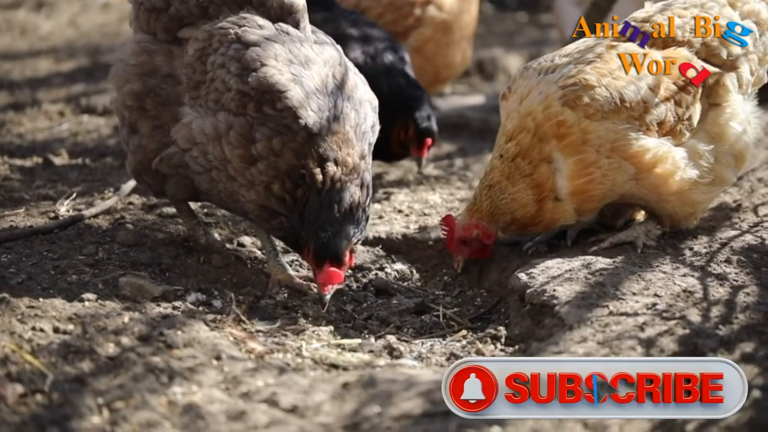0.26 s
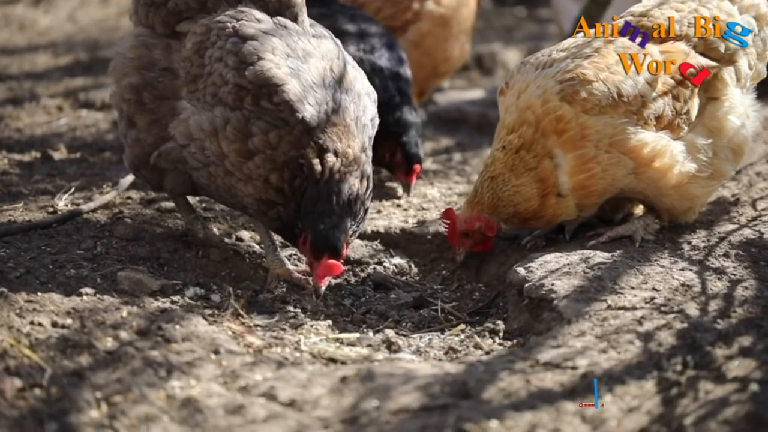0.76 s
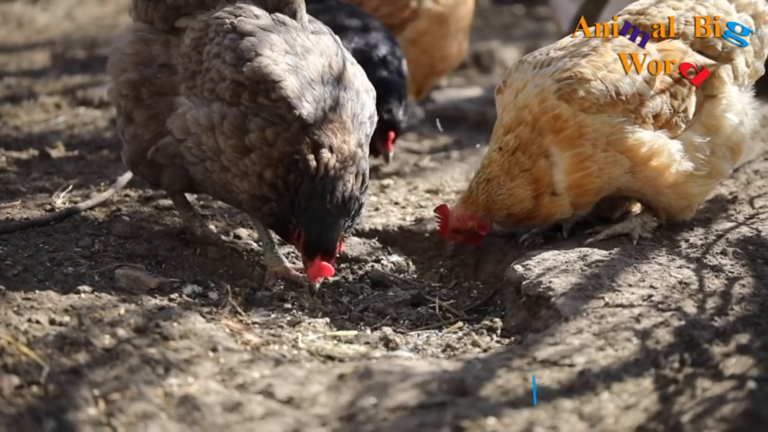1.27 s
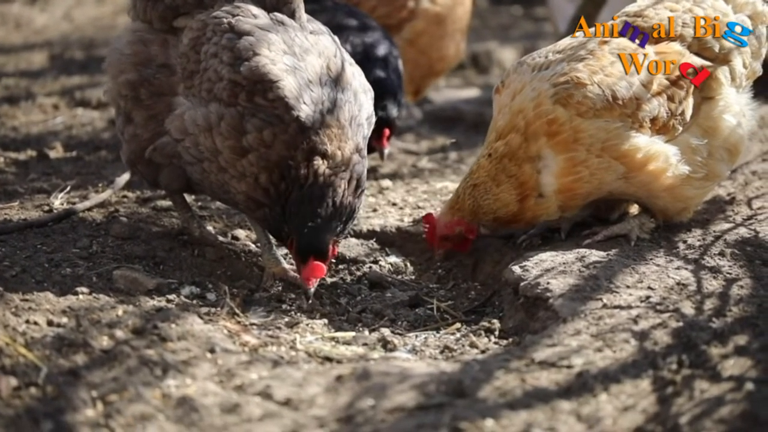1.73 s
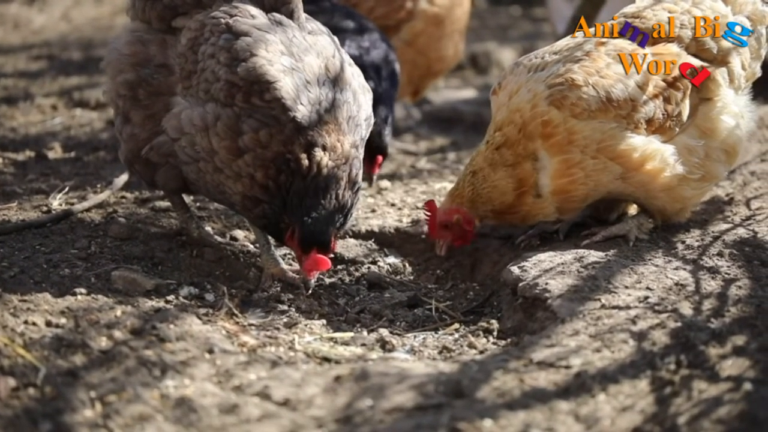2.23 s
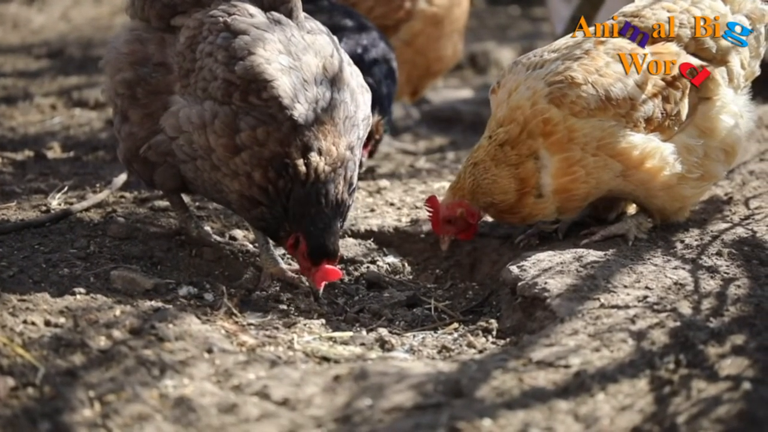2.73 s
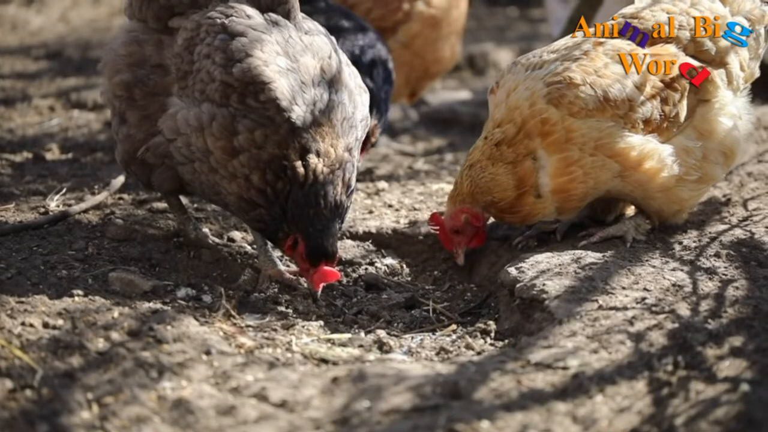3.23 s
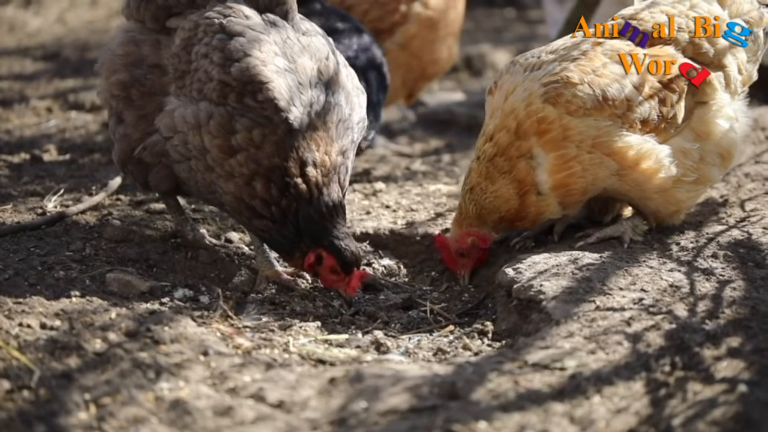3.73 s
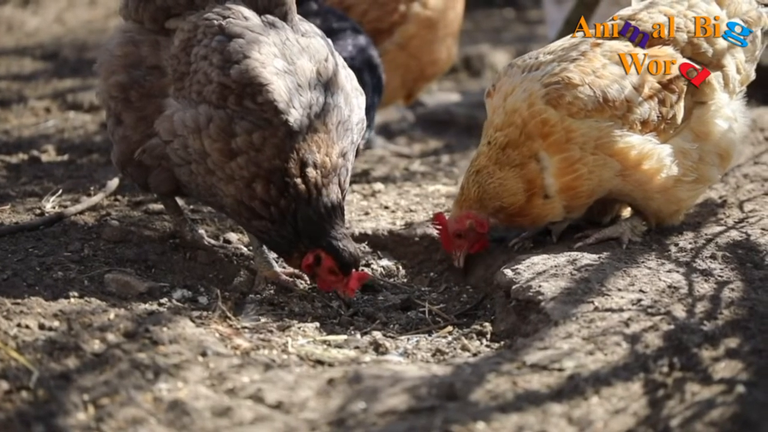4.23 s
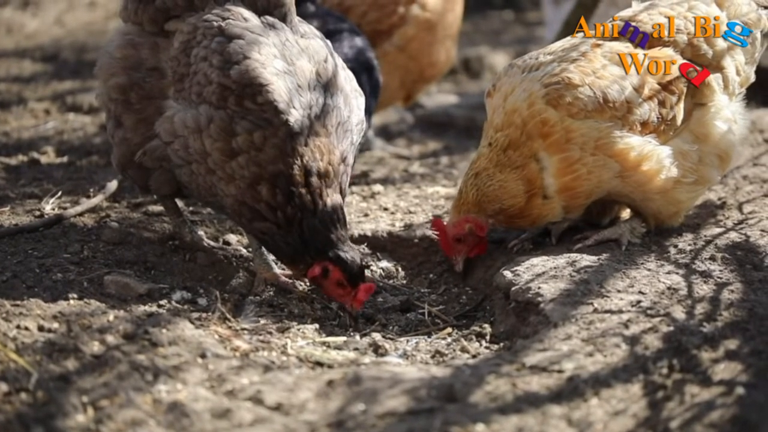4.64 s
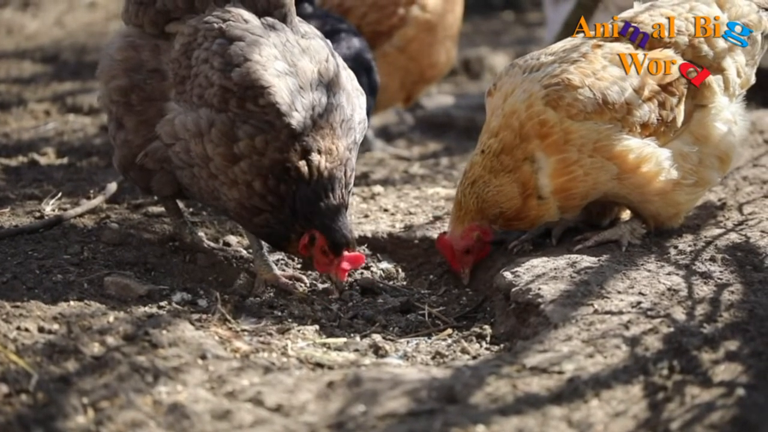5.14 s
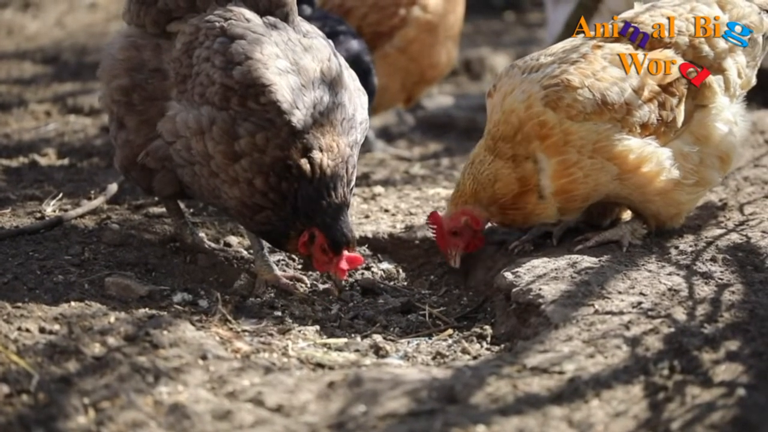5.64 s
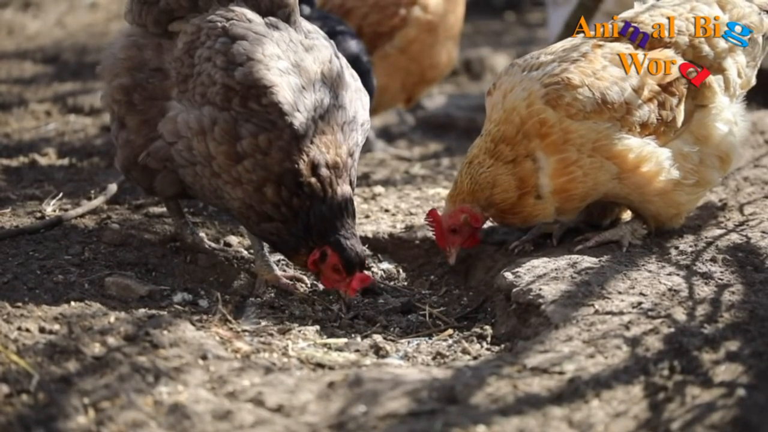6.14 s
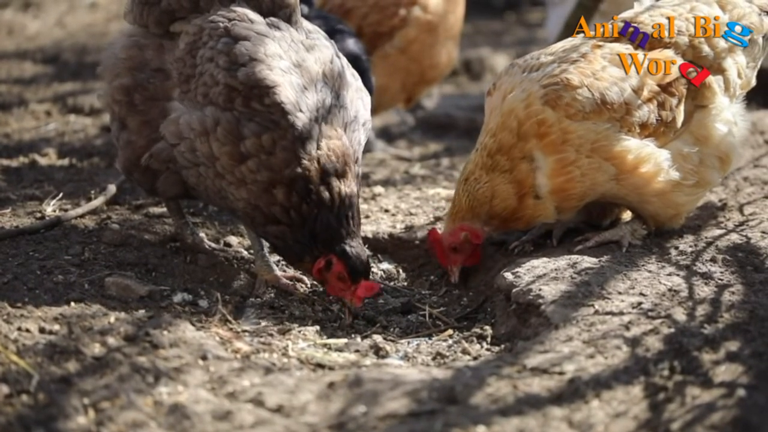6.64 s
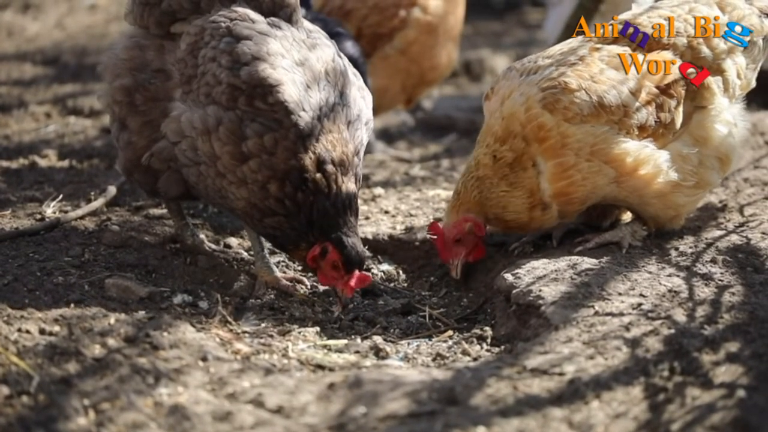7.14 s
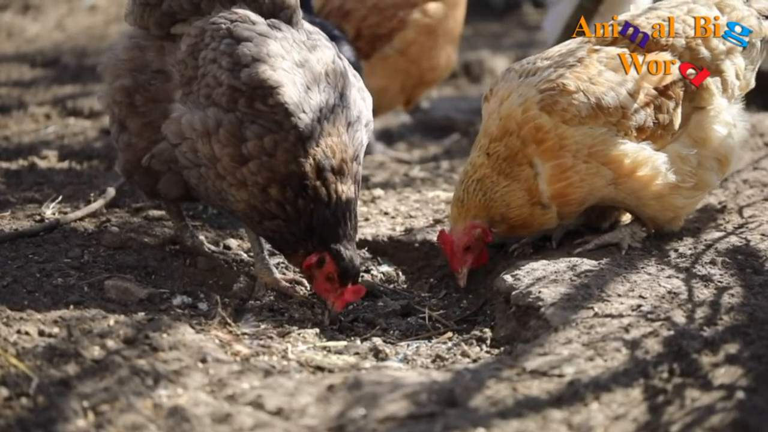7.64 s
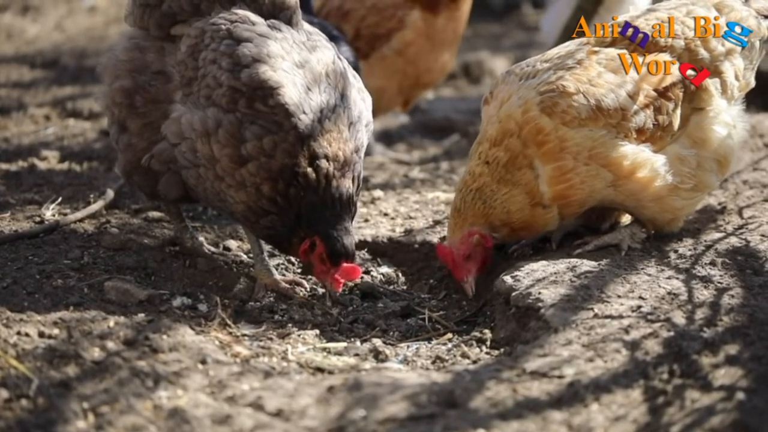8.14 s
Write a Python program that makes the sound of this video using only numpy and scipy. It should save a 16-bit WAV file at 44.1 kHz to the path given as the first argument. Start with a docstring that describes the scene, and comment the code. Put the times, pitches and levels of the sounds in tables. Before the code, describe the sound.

Close to hens feeding in a yard, feet scratch the dirt and beaks tick on stones over a steady low hum. A brief squawk and a single wing flap come first, then a long rising call runs into a held, slightly lower one. Murmurs and scattered clucks follow, with dull thumps on the ground toward the end. A distant songbird trills faintly, and walls add a short echo to the calls.

```python
"""Hens feeding in a yard

Hens call, murmur, squawk and cluck: a vibrating membrane and pulsed breath excite the throat's resonances.
A wing beats once, feet rake and thump the soil, and beaks peck, all heard as shaped bursts of noise.
A songbird trills far off, gliding whistles sound, and two brief tones ring after a late peck.
A low hum and a faint hiss fill the yard; the walls return voices and tones as a short reverberation."""
import sys
import numpy as np
from scipy import signal
from scipy.fft import rfft, irfft, next_fast_len
from scipy.io import wavfile
from scipy.ndimage import uniform_filter1d

SR = 44100
rng = np.random.default_rng(int(sys.argv[2]) if len(sys.argv) > 2 else 0)


def transcribe(u):
    """Save the signal u as a 16-bit wav file named by the first command-line argument.

    u: samples, shape (n,) or (channels, n), limited to [-1, 1]; the rate is SR.
    q: integer samples, one column per channel.
    """
    v = np.clip(np.atleast_2d(u).T, -1, 1)
    q = np.round(v * 32767).astype(np.int16)
    wavfile.write(sys.argv[1], SR, q)


N = 369999

# All levels are relative. Balance is left minus right; opening (of the beak) and roughness run 0-1.
# reverberation of the walls: (frequency [Hz], time to fall 60 dB [s])
WALL_DECAY = [(200, 0.049), (1000, 0.26), (4000, 0.19), (6000, 0.28), (10000, 0.0057)]
# noise spectra of the yard, grit, clods and ground: (frequency [Hz], spectral density [dB])
YARD_SPECTRUM = [(55, -23.5), (95, -20), (125, -10.5), (172, 0.5), (200, -5), (280, -21.5), (500, -29.5),
                 (780, -20.5), (1060, -30), (1250, -24), (2200, -39.5), (3100, -38.5), (5700, -48),
                 (8900, -43), (10800, -58), (15000, -94.5)]
GRIT_SPECTRUM = [(2500, -21.5), (4000, 2.5), (6000, -0.5), (8500, 0.5), (10000, -11), (11000, -20.5),
                 (15000, -23)]
CLOD_SPECTRUM = [(200, -17), (320, -4), (1000, -5), (2000, -5), (3200, -7.5), (4800, -16.5), (7000, -29),
                 (11000, -61)]
GROUND_SPECTRUM = [(15, -28), (30, -15.5), (55, 1), (95, -0.5), (135, -2), (180, -8.5), (300, -25.5),
                   (600, -81.5)]
# hiss of feathers: (frequency [Hz], spectral density [dB])
FEATHER_SPECTRUM = [(700, -2.5), (1200, -3.5), (4000, -11.0), (8000, -15.5), (11000, -47.0)]
# likeness of left and right: (frequency [Hz], correlation [-1 to 1])
YARD_CORR = [(60, 0.13), (170, 1), (470, 0.28), (1320, -0.43), (3700, 0.75), (10400, -0.49)]
GRIT_CORR, CLOD_CORR = [(3000, 0.54), (9000, 0.037)], [(500, 0.44), (5000, 0.54)]
GROUND_CORR, PECK_CORR = [(60, 0.97)], [(3000, 0.68), (9000, 0.2)]
WHUMP_CORR, FEATHER_CORR = [(500, 0.68)], [(2000, 0.93), (8000, 0.32)]
# whistles and, in the last two rows, brief ringing tones after a peck: (time [s], length [s],
# start pitch [Hz], middle pitch [Hz], end pitch [Hz], level [dB], overtone [dB], quaver [share of pitch])
SINGLE_TONES = [(2.122, 0.064, 3970, 2470, 2040, -44.5, -3, 0.024),
                (4.278, 0.29, 2870, 3120, 3350, -61, -28, .02),
                (7.507, 0.025, 4400, 4650, 4470, -57, -30, 0.064),
                (7.566, 0.057, 4000, 3570, 3330, -56, -33, 0.055),
                (7.696, 0.24, 2630, 2930, 3100, -64, -30, 0.0089),
                (7.929, 0.054, 3170, 3240, 3150, -48.5, -30, .03),
                (8.001, 0.042, 2580, 2530, 2430, -54, -30, .02)]
# songbird phrases: (time [s], note pairs [count], level [dB])
TRILLS = [(.642, 9, -54), (4.595, 8, -55), (8.046, 4, -55)]
# feet raking soil: (peak time [s], rise [s], fall [s], grit level [dB], clod level [dB])
SCRATCHES = [(.02, .1, 0.38, -66, -71), (.36, 0.59, 0.23, -54, -50), (.71, 0.1, 0.17, -57, -55),
             (1.04, 0.27, 0.32, -59, -80), (1.28, 0.12, 0.12, -62, -65), (1.38, 0.036, 0.12, -56.5, -49.5),
             (1.63, 0.037, 0.17, -71, -59.5), (1.81, 0.18, 0.14, -59.5, -60.5),
             (1.9, .02, 0.066, -62.5, -63), (2.17, 0.15, 0.2, -62.5, -53.5),
             (2.45, 0.041, 0.091, -54, -55.5), (3.08, 0.11, 0.22, -61, -50.5), (3.3, 0.065, 0.15, -56, -53),
             (3.57, 0.11, 0.1, -52.5, -49), (4.05, 0.46, 0.82, -68.5, -59.5), (4.39, 0.29, 0.22, -60, -60),
             (4.73, 0.16, 0.35, -60, -62), (4.96, 0.16, 0.96, -61, -68.5), (5.25, 0.11, 0.12, -47.5, -50),
             (5.37, 0.048, 0.14, -48.5, -48.5), (5.67, 0.019, 0.077, -50.5, -52),
             (5.76, 0.16, 0.23, -55.5, -46.5), (5.88, 0.18, 0.11, -56, -56), (6.04, 0.048, 0.055, -58, -75),
             (6.14, 0.025, 0.14, -61.5, -55), (6.37, 0.11, 0.137, -58.5, -59),
             (6.57, 0.017, 0.087, -59.5, -43), (6.69, 0.15, 0.18, -57, -54.5), (6.85, 0.08, 0.29, -65, -50),
             (7.0, 0.19, 0.1, -48.5, -42), (7.09, 0.29, 0.08, -77, -48), (7.36, 0.029, 0.18, -57.5, -43.5),
             (7.63, 0.058, 0.17, -67, -54.5), (7.88, 0.043, 0.072, -50, -56),
             (7.95, 0.17, 0.25, -60.5, -50.5), (8.18, 0.027, 0.036, -57, -56),
             (8.37, 0.27, 0.072, -56.5, -55.5)]
# thumps through the ground: (peak time [s], rise [s], fall [s], level [dB])
THUMPS = [(.05, 0.19, 0.93, -49), (.312, 0.063, 0.061, -39.5), (.56, 0.098, 0.19, -46),
          (.78, 0.063, 0.041, -43), (1.15, 0.11, 0.45, -57), (1.54, 0.72, 0.24, -47.5),
          (1.74, 0.097, 0.092, -48), (2.0, 0.13, 0.56, -49), (2.3, 0.29, 0.88, -46),
          (2.63, 0.37, 0.19, -49), (3.1, 0.12, 0.66, -51), (4.33, 0.16, 0.14, -50),
          (4.57, 0.12, 0.027, -43), (5.23, 0.068, 0.17, -46), (5.44, 0.12, 0.08, -47),
          (5.73, 0.21, 0.17, -50), (5.95, 0.043, 0.13, -41), (6.3, 0.44, 0.17, -54.5),
          (6.5, 0.078, 0.97, -46.5), (6.84, 0.06, 0.056, -31), (6.93, 0.092, 0.17, -32.5),
          (7.345, 0.021, 0.29, -27), (7.41, 0.051, 0.1, -35.5), (7.93, 0.073, 0.16, -31),
          (8.24, 0.083, 0.11, -42)]
# pecks on stones and grain: (time [s], level [dB], band centre [Hz], time to fall 60 dB [s])
PECKS = [(1.032, -43, 6400, 0.033), (2.448, -54.5, 5400, 0.041), (3.55, -46.5, 6070, 0.046),
         (5.358, -35.5, 3350, 0.33), (5.411, -46, 2250, 0.19), (6.315, -47.5, 2340, 0.37),
         (6.563, -40, 3200, 0.029), (6.571, -34, 2980, 0.035), (7.841, -35, 6800, 0.029),
         (7.912, -43.5, 2600, 0.54), (8.173, -39.5, 6860, .03)]
# course of the wing beat: (time [s], whump level [dB], gust level [dB], feather level [dB])
WING_BEAT = [(.4, -55, -61, -49.5), (.43, -30.5, -53, -43), (.458, -18, -49, -30), (.476, -7.5, -15.5, -33),
             (.487, -19.5, -18.5, -34.5), (.525, -27, -53, -40), (.57, -31, -56, -49), (.62, -36, -58, -57),
             (.68, -44, -64, -67), (.76, -50, -58, -78)]
# hollow resonances of the whump: (frequency [Hz], bandwidth [Hz], level [dB])
WHUMP_MODES = [(308, 63, -3), (516, 128, 0), (691, 127, -2)]
# throat responses, each pair for the beak shut and then open: (frequency [Hz], gain [dB])
CALL_THROAT_SHUT = [(200, -44.5), (300, -19), (430, -6.5), (600, 5), (800, -0.5), (1200, -5), (1750, -18.5),
                    (2200, -54.5), (3700, -47), (5000, -64), (11000, -93)]
CALL_THROAT_OPEN = [(200, -56.5), (300, -19), (530, -8.5), (1050, -1.5), (1300, 10), (1580, -14.5),
                    (2100, -15), (2650, -21.5), (3150, -24.5), (3700, -13), (4300, -30), (5000, -45),
                    (5800, -47.5), (6250, -40), (6800, -53.5), (11000, -58)]
SQUAWK_THROAT_SHUT = [(300, -23.5), (450, -13.5), (620, -26), (800, 0), (1000, -5), (1270, -3.5),
                      (1550, -2.5), (1760, -2.5), (1900, -19), (2300, -21.5), (3000, -29), (6000, -66),
                      (11000, -76)]
SQUAWK_THROAT_OPEN = [(300, -27), (600, -7.5), (900, -3.5), (1300, -11.5), (1600, -7), (1900, -6.5),
                      (2800, -7.5), (3770, -11), (5100, -25), (7300, -30), (8900, -22.5), (10800, -39.5),
                      (15000, -51)]
SOFT_THROAT_SHUT = [(180, -24), (280, 9), (350, -10), (450, -4), (780, 2.5), (950, -19), (1300, -26.5),
                    (1800, -43), (3000, -57.5), (11000, -84.5)]
CLUCK_THROAT_OPEN = [(200, -20), (390, -3.5), (570, -11), (750, -4), (960, -5), (1150, -10.5), (1400, -2.5),
                     (1750, -15.5), (2050, -25), (2280, -18), (2700, -22.5), (3150, -33.5), (5200, -52),
                     (11000, -69)]
# drawn-out calls: (roughness, balance [dB], rows of (time [s], pitch [Hz], level [dB], opening))
CALLS = [(0.0036, 1.6, [(2.26, 418.7, -56.5, 0), (2.39, 467, -44, 0), (2.464, 542.6, -37.5, 0),
         (2.58, 572.2, -35, 0.17), (2.79, 610.7, -30, 0.35), (2.83, 583.6, -29, 0.18),
         (2.905, 564, -29.5, 0.58), (2.925, 619, -26.5, 0.33), (3.0, 618.4, -28, 0.36),
         (3.085, 638.4, -29, 0.26)]), (0.0021, 2.7, [(3.07, 565, -27, 0.3), (3.1, 525.7, -27, 0.84),
         (3.33, 532, -26, 0.92), (3.43, 510.4, -28.5, 0.89), (3.56, 505.8, -28, 0.92),
         (3.585, 519, -44, 0.65)]), (0.067, 1, [(3.575, 565, -28, 0.4), (3.6, 549.5, -35.5, 0.4),
         (3.617, 538, -36, 0.7), (3.635, 521, -42.5, 0.3), (3.68, 540, -58, 0.2)]),
         (.01, -3, [(4.17, 375.5, -64, 0.5), (4.23, 395, -63, 0.4), (4.3, 417, -65, 0.7),
         (4.4, 400, -67, 0.9), (4.47, 397, -70, .6)]), (0.046, 1, [(8.03, 369.4, -51, 0.04),
         (8.085, 389.7, -52.5, 0), (8.13, 439, -46.5, 0.32), (8.25, 476, -48, 0.3),
         (8.39, 514, -39.5, 0.68)])]
# low murmurs: (balance [dB], rows of (time [s], pitch [Hz], level [dB]))
MURMURS = [(-0.42, [(5.07, 359, -46), (5.096, 356.6, -40.5), (5.13, 432.3, -37), (5.236, 439.7, -47),
           (5.33, 513, -40), (5.43, 487, -54.5)]), (-1.6, [(5.4, 716, -48), (5.444, 748, -49.5),
           (5.524, 736, -46.5), (5.62, 740, -75)])]
# squawks: (start roughness, end roughness, balance [dB], rows as in CALLS)
SQUAWKS = [(.15, 0.4, 1.6, [(.092, 663, -53, 0.63), (.104, 673.4, -31, 0.46), (.112, 701, -27, 0.55),
           (.12, 799, -22, 0.79), (.14, 830, -29, 1), (.15, 897, -26.5, 0.94), (.188, 921, -28.5, 1),
           (.197, 935, -20, 0.93), (.225, 916, -29, 0.97), (.27, 922, -40, 0.92), (.305, 921, -46, 1)]),
           (0.463, 0.49, 1.5, [(.195, 334, -29, .1), (.205, 325.6, -27.5, 0.093), (.222, 317.7, -22, 0.14),
           (.25, 319, -40, 0.24), (.3, 313.2, -43, 0.26)]), (0.39, 0.3, 0.15, [(6.735, 439, -49, 0.25),
           (6.76, 419.7, -42, 0.28), (6.78, 383.4, -43, .05), (6.8, 387, -38.5, .05),
           (6.83, 376, -42.5, 0.058), (6.865, 370, -61, .05)]), (0.27, .1, 0, [(6.83, 422, -49, 0),
           (6.845, 432, -48, 0), (6.87, 456, -53, 0), (6.92, 453, -58, 0), (6.95, 460, -60, 0)]),
           (0.089, 0.1, 1.8, [(6.99, 581, -61, 0), (7.016, 622, -38, 0), (7.043, 630.5, -32.5, 0.0042),
           (7.075, 625, -42, 0), (7.1, 630, -62, 0)]), (0.12, 0.27, 1.5, [(7.045, 434, -48, .05),
           (7.062, 436.6, -41, .05), (7.085, 434, -38.5, .05), (7.11, 440, -46.5, .05),
           (7.13, 450, -57.5, .05)])]
# clucks: (time [s], pitch [Hz], level [dB], nominal length [s], opening, roughness, balance [dB])
CLUCKS = [(0.608, 420.4, -37.5, 0.05, 0.6, 0.7, -5), (0.773, 383, -39.5, 0.062, 0.74, 0.22, -2),
          (1.061, 414.5, -39.5, 0.055, 0.14, 0.25, 1), (1.38, 320, -54, 0.077, 0, 0.87, -2),
          (2.905, 247, -48.5, 0.064, 0, 0, -1), (2.908, 305, -46, 0.033, 1, 0.1, -1),
          (3.082, 271, -45.5, 0.1, 0, 0, -2), (4.031, 349, -45, 0.1, 0.29, 0.73, -1),
          (5.662, 578.4, -40.5, 0.097, 1, 0.61, 2.5), (5.694, 487.4, -43.5, 0.11, 0.94, 0.48, 2),
          (5.726, 457.3, -44, 0.13, 0.7, 0.7, -2), (5.801, 386, -44, 0.062, 0.2, 0.43, -2),
          (5.922, 383, -37, 0.072, 0.68, 0.26, 1), (6.125, 377.4, -38.5, 0.055, 0.82, 0.36, 2),
          (6.257, 389.7, -40, 0.055, 0.83, 0.25, 1), (6.407, 328.4, -41, 0.04, 0.67, 0.28, 0),
          (6.535, 400.6, -36.5, 0.13, 0.6, 0.83, 2), (6.712, 277, -41.5, 0.09, 0.1, 0.09, 1),
          (8.085, 287.7, -39, 0.076, 0, 0.08, -1)]


def amp(db):
    """Amplitude grows tenfold with every 20 dB."""
    return 10 ** (np.asarray(db) / 20)


def unit(x):
    """Normalisation to an rms of 1."""
    return x / np.sqrt(np.mean(x ** 2) + 1e-20)


def along(points, hz):
    """Interpolation of (frequency, value) points on a logarithmic frequency axis."""
    freqs, values = np.transpose(points)
    return np.interp(np.log(hz + 1), np.log(freqs + 1), values)


def response_of(points):
    """Amplitude response of a spectrum given in dB."""
    return lambda hz: amp(along(points, hz))


def curves(rows):
    """Linear interpolation in time: the samples that the rows span, and each column on them."""
    times, *columns = np.transpose(rows)
    at = np.arange(max(round(times[0] * SR), 0), min(round(times[-1] * SR), N))
    return at, [np.interp(at / SR, times, column) for column in columns]


def wobble(rate, at, count=1):
    """Random modulation: lines joining Gaussian knots, rate knots a second."""
    knots = rng.standard_normal((count, 5000))
    k, part = np.divmod(at * rate / SR, 1)
    k = k.astype(int) % (knots.shape[1] - 1)
    return knots[:, k] * (1 - part) + knots[:, k + 1] * part


def filtered(x, response):
    """Linear filtering: the spectrum is multiplied by a frequency response."""
    size = next_fast_len(x.shape[-1] + 8192)
    return irfft(rfft(x, size) * response(np.fft.rfftfreq(size, 1 / SR)), size)[..., :x.shape[-1]]


def noise(response, correlation, grain_db=0, rate=300, size=N):
    """Mid and side noise mix to set the correlation; grain mimics many small contacts."""
    pair = rng.standard_normal((2, size)) * amp(grain_db * wobble(rate, np.arange(size)))
    angle = lambda hz: np.arccos(np.clip(along(correlation, hz), -1, 1)) / 2
    mid, side = filtered(pair, lambda hz: response(hz) * [np.cos(angle(hz)), np.sin(angle(hz))])
    return unit(np.array([mid + side, mid - side]))


def patchy(x, depth_db):
    """Modulation in time and frequency: the gain varies in random patches."""
    spectra = signal.stft(x, nperseg=512)[2]
    field = rng.standard_normal(spectra.shape[1:])
    field = uniform_filter1d(uniform_filter1d(field, size=14, axis=0), size=14, axis=1)
    return signal.istft(spectra * amp(depth_db * unit(field)), nperseg=512)[1][:, :N]


def swells(rows, skirt_db=20):
    """Exponential rises and falls add in power, giving one envelope for each level column."""
    t, out = np.arange(N) / SR, np.zeros((len(rows[0]) - 3, N))
    for s, rise, fall, *db in rows:
        at = slice(max(round((s - 2 * rise) * SR), 0), round((s + 2 * fall) * SR))
        from_peak = np.maximum((s - t[at]) / rise, (t[at] - s) / fall)
        out[:, at] = np.hypot(out[:, at], amp(np.array(db)[:, None] - skirt_db * from_peak))
    return out


def yard(level_db=-49):
    """Ambient noise: a far hum and the hiss above it waver independently."""
    air = noise(response_of(YARD_SPECTRUM), YARD_CORR)
    hum = filtered(air, lambda hz: hz < 260)
    hum_gain = amp(level_db + 1.2 * wobble(4.3, np.arange(N)))
    hiss_gain = amp(level_db + 1.57 * wobble(3.145, np.arange(N)))
    return hum_gain * hum + hiss_gain * patchy(air - hum, depth_db=3.0)


def walls(x):
    """Reverberation: each frequency decays at its own rate; the tail changes as the birds move."""
    hop = SR // 2
    out, padded = np.zeros((2, N + 3 * SR)), np.pad(x, (hop, SR))
    crossfade = np.sin(np.pi * np.arange(SR) / SR)
    for start in range(0, N + hop, hop):
        hz, t, spectra = signal.stft(rng.standard_normal((2, SR // 3)), SR, nperseg=256)
        decay = amp(-60 * t / along(WALL_DECAY, hz)[:, None])
        tail = signal.istft(spectra * decay, SR, nperseg=256)[1]
        segment = padded[start:start + SR] * crossfade
        echo = signal.fftconvolve(segment[None], tail / np.linalg.norm(tail[0]), axes=1)
        out[:, start:start + echo.shape[1]] += echo
    return out[:, hop - 300:hop - 300 + N]


def note(s, length, pitches, db, overtone_db, quaver):
    """Frequency modulation: a tone quavers along a three-pitch glide while its octave grows."""
    progress = np.linspace(0, 1, round(length * SR))
    at = np.arange(len(progress))
    glide = np.polyval(np.polyfit([0, .5, 1], pitches, 2), progress)
    phase = 2 * np.pi * np.cumsum(glide * (1 + quaver * wobble(400, at)[0])) / SR
    tone = np.sin(phase) + amp(overtone_db) * progress ** 2 * np.sin(2 * phase)
    envelope = amp(db) * np.abs(np.sin(np.pi * progress)) ** .6
    return round(s * SR) + at, tone * envelope


def birdsong_and_ringing(pair_period_s=.0965):
    """Gliding tones: whistles, ringing after a peck, and a trill of falling and rising notes."""
    notes = [note(s, length, pitches, db, overtone_db, quaver)
             for s, length, *pitches, db, overtone_db, quaver in SINGLE_TONES]
    for s, count, db in TRILLS:
        for start in s + pair_period_s * np.arange(count):
            up_db, down_db = db + rng.normal([1.5, -3], .7)
            notes.append(note(start - .003, .032, [4100, 4380, 4430], up_db, -40, quaver=.025))
            delays = [0, *rng.uniform(.008, .08, 5)]  # scattering by leaves blurs the falling note
            for delay, loss_db in zip(delays, [0, 9, 10, 11, 12, 13]):
                notes.append(note(start - .047 + delay, .042, [6250, 5330, 5000],
                                  down_db - loss_db, -40, quaver=.035))
    at, sound = (np.concatenate(part) for part in zip(*notes))
    return np.bincount(at, sound, N)[:N]


def feet():
    """Friction and impact: raking throws fine grit and dull clods; the ground conducts thumps."""
    shuffle = amp(np.array([[-80], [-77]]) + 4 * wobble(11, np.arange(N)))  # constant small steps
    grit_gain, clod_gain = np.hypot(swells(SCRATCHES), shuffle)
    grit = patchy(noise(response_of(GRIT_SPECTRUM), GRIT_CORR, grain_db=2.0, rate=460), depth_db=1.5)
    clods = noise(response_of(CLOD_SPECTRUM), CLOD_CORR, grain_db=1.5, rate=430)
    footfalls = amp(-63 + 3.5 * wobble(3.8, np.arange(N)))  # faint, between the thumps
    ground = noise(response_of(GROUND_SPECTRUM), GROUND_CORR, grain_db=3.5, rate=19)
    return grit_gain * grit + clod_gain * clods + np.hypot(swells(THUMPS), footfalls) * ground


def pecks(attack_s=0.0011):
    """Impact transients: each peck is a broad band of noise that decays exponentially."""
    out, t = np.zeros((2, N + SR)), np.arange(SR // 5) / SR
    for s, db, centre_hz, t60 in PECKS:
        band = lambda hz: np.exp(-(np.log((hz + 1) / centre_hz) / 0.34) ** 2)
        envelope = amp(db - 5.0 - 60 * t / t60) * np.clip(t / attack_s, 0, 1)
        start = round(s * SR)
        out[:, start:start + len(t)] += envelope * noise(band, PECK_CORR, grain_db=1, size=len(t))
    return out[:, :N]


def whump_response(hz):
    """Damped resonances, summed with alternating sign and cut off in the bass, sound hollow."""
    modes = sum((-1) ** k * amp(db) * 1j * hz * width / (centre ** 2 - hz ** 2 + 1j * hz * width)
                for k, (centre, width, db) in enumerate(WHUMP_MODES))
    return modes * (hz > 230)


def wing(gust_hz=33):
    """Displacement of air: one wing beat gives a hollow whump, a gust and the hiss of feathers."""
    at, (whump_db, gust_db, feather_db) = curves(WING_BEAT)
    whump = noise(whump_response, WHUMP_CORR, grain_db=0.5, rate=79.7, size=SR // 2)
    # the air pushes in and swings back, reaching left and right a little apart
    gust = np.cos(2 * np.pi * gust_hz * (at / SR - [[.477], [.473]]))
    feathers = noise(response_of(FEATHER_SPECTRUM), FEATHER_CORR, grain_db=2.0, size=SR // 2)
    out = np.zeros((2, N))
    out[:, at] += amp(whump_db + [[-2.5], [2.5]]) * whump[:, :len(at)]
    out[:, at] += amp(gust_db + [[5.5], [.8]]) * gust
    out[:, at] += amp(feather_db) * feathers[:, :len(at)]
    return out


def membrane(phase, order, gains, flutter):
    """Harmonics of a vibrating membrane; phase noise grows with their order and sounds hoarse."""
    spread = .2 * np.sqrt(order - 1) + .005 * order ** 2
    phase_noise = spread * wobble(220, np.arange(len(phase)), count=len(order))
    return np.sum(gains * flutter * np.sin(order * phase + phase_noise), 0)


def add_voice(out, rows, roughness, balance_db, shut, wide, jitter, flutter_db, fade_s=0.0039):
    """Source and filter: membrane harmonics and breath pulsed once a cycle pass through the throat."""
    at, (hz, db, opening) = curves(rows)
    opening = np.clip(opening, 0, 1)
    rough = np.clip(np.linspace(*roughness, len(at)), 0, 1)  # breath's share of the power
    unsteadiness = jitter * (1.45 - 0.9 * opening + 3.2 * rough)  # greater with the beak shut
    phase = 2 * np.pi * np.cumsum(hz * (1 + unsteadiness * wobble(170, at)[0])) / SR
    order = np.arange(1, 17)[:, None]
    gains = amp((1 - opening) * along(shut, order * hz) + opening * along(wide, order * hz))
    gains /= np.sqrt(np.sum(gains ** 2, 0) / 2)
    # each harmonic flutters on its own as the throat shifts
    flutter = amp(flutter_db * wobble(95, at, count=len(order)))
    tone = membrane(phase, order, gains, flutter)
    puffs = rng.standard_normal(SR)[:len(at)] * (1 + 1.6 * np.cos(phase))
    breath_shut, breath_wide = (unit(filtered(puffs, response_of(throat))) for throat in (shut, wide))
    breath = (1 - opening) * breath_shut + opening * breath_wide
    voice = np.sqrt(1 - rough) * tone + np.sqrt(rough) * breath
    fade = np.clip(np.minimum(at - at[0], at[-1] - at) / (fade_s * SR), 0, 1)
    out[:, at] += voice * fade * amp(db + np.array([[balance_db], [-balance_db]]) / 2)


def hens(murmur_opening=0.05, murmur_roughness=0.15):
    """Pitch contour and throat resonances set calls, murmurs, squawks and clucks apart."""
    out = np.zeros((2, N))
    for rough, balance_db, rows in CALLS:
        add_voice(out, rows, [rough] * 2, balance_db, CALL_THROAT_SHUT, CALL_THROAT_OPEN,
                  jitter=0.019, flutter_db=3.3)
    for balance_db, contour in MURMURS:
        rows = [(*row, murmur_opening) for row in contour]
        add_voice(out, rows, [murmur_roughness] * 2, balance_db, SOFT_THROAT_SHUT, CALL_THROAT_OPEN,
                  jitter=0.0312, flutter_db=6.0)
    for *roughness, balance_db, rows in SQUAWKS:
        add_voice(out, rows, roughness, balance_db, SQUAWK_THROAT_SHUT, SQUAWK_THROAT_OPEN,
                  jitter=0.015, flutter_db=6.5)
    for s, hz, db, length, opening, rough, balance_db in CLUCKS:
        # a cluck bursts out, holds briefly and dies away
        rows = [(s - .004, 0.973 * hz, db - 14.0, opening),
                (s + 0.0076, hz, db, opening),
                (s + 0.36 * length, hz, db - 1.5, opening),
                (s + 1.3 * length, .96 * hz, db - 24.5, opening)]
        add_voice(out, rows, [rough] * 2, balance_db, SOFT_THROAT_SHUT, CLUCK_THROAT_OPEN,
                  jitter=0.021, flutter_db=6.5)
    return out


def scene():
    """Superposition of all sources; the high tones have a larger share of echo than the near hens."""
    voices, tones = hens(), birdsong_and_ringing()
    direct = amp(-2.0) * voices + amp(-2.5) * tones + wing()
    echo = walls(amp(-6.5) * voices.mean(0) + amp(-3.5) * tones)
    return direct + echo + feet() + pecks() + yard()


def record(dry, ceiling=.95, shelf_hz=10990, cutoff_hz=15000):
    """Soft saturation rounds the peaks; band limiting lowers, then removes, the highest treble."""
    rounded = dry / (1 + np.abs(dry / ceiling) ** 4) ** (1 / 4)
    return filtered(rounded, lambda hz: np.where(hz < shelf_hz, 1, amp(-9.0) * (hz < cutoff_hz)))


dry = scene()
out = record(dry)
transcribe(out)
```